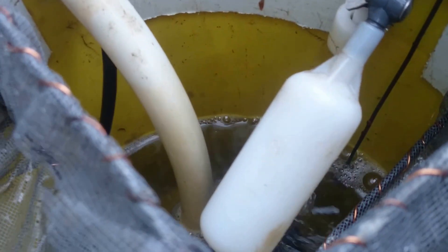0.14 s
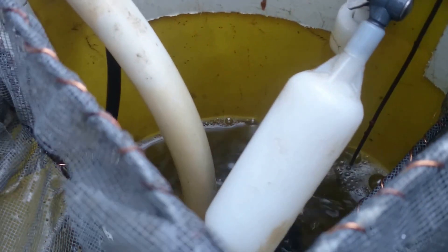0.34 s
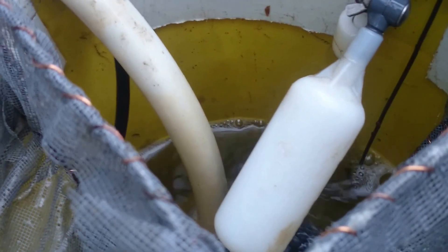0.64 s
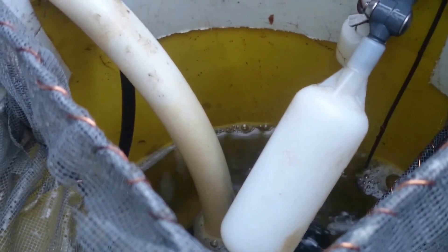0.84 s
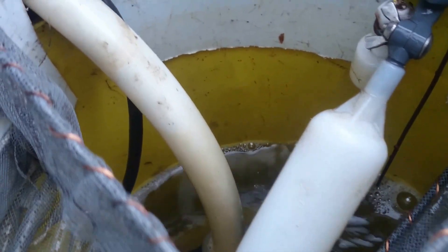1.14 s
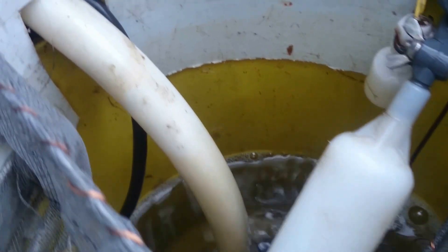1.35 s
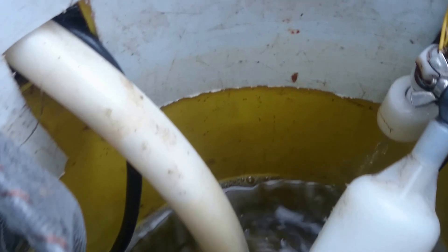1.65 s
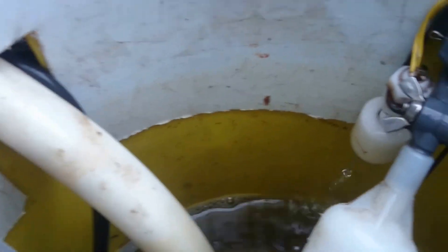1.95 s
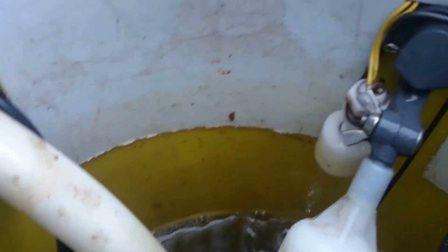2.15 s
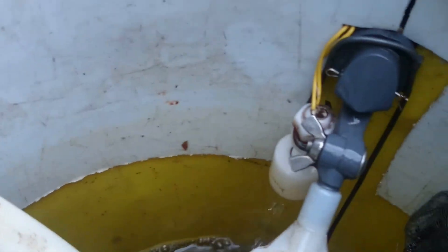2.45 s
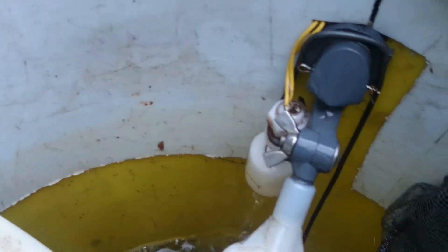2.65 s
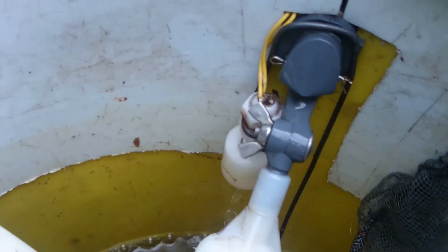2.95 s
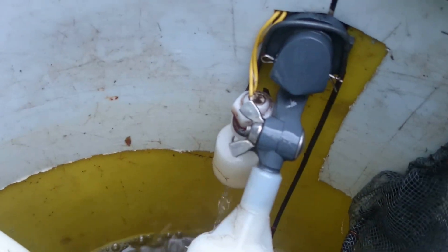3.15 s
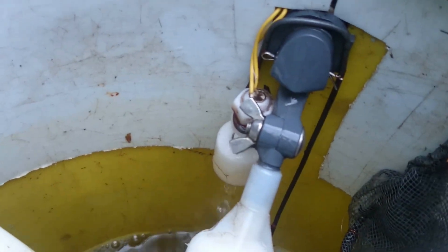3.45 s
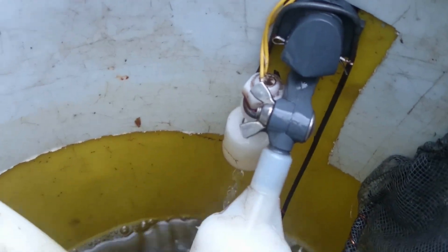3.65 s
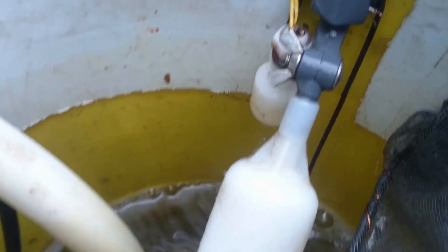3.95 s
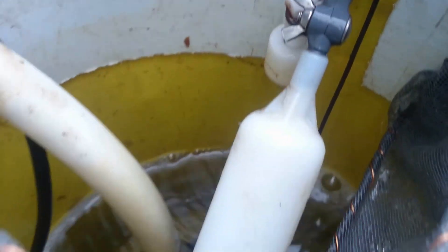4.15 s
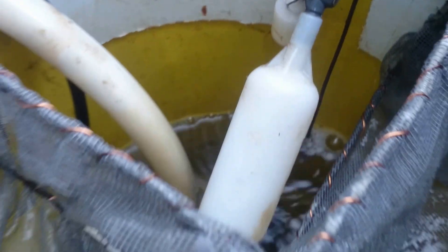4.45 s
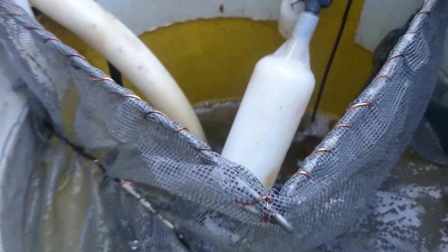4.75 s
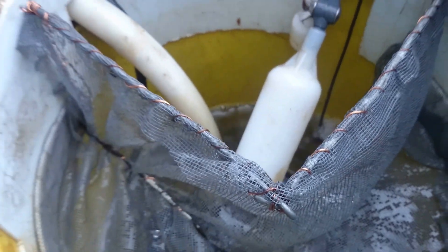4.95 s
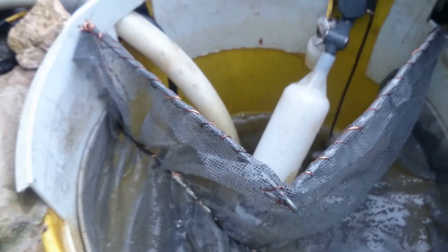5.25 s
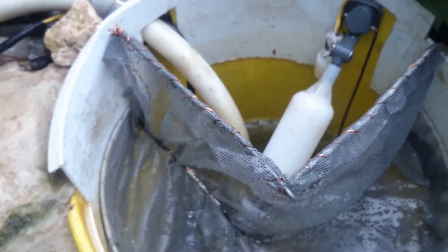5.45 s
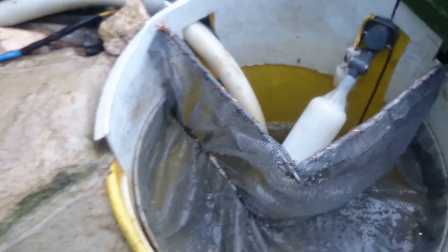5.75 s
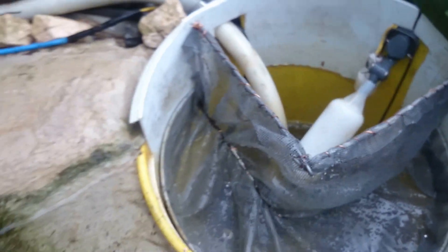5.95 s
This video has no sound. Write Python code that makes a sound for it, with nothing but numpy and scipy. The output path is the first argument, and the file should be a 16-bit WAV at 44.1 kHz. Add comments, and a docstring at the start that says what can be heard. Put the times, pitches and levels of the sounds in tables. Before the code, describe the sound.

An irregular trickle lands in a plastic tub, heard from just above the rim. Sharp ticks and small wet splats alternate with glassy plinks, tiny upward bubble chirps and fine droplet patter leaning left. It starts sparse, grows busy in the middle, peaks with hard splashes past four seconds, and becomes sparser again. Faint airy hiss and soft pump rumble continue throughout, with brief hollow plastic resonance.

```python
"""Water drips and plinks into a half-full plastic bucket from a float valve, heard just above the rim.
Each drop makes a thud, a wet slap and a hard tick, from filtered sharp pushes with echoes off the wall.
Bubbles are fading tones that rise in pitch, some stirred into a gurgle; tiny bubbles and ticks make a patter.
The bucket rings along with all of these. Some bubbles sweep upward as they open, and thin whistles come and go.
Underneath, shaped noise makes the valve's hiss and the pump's rumble, with faint steady pump tones."""
import sys
import numpy as np
from scipy import signal
from scipy.fft import rfft, irfft
from scipy.io import wavfile
from scipy.ndimage import uniform_filter1d

SR = 44100
rng = np.random.default_rng(int(sys.argv[2]) if len(sys.argv) > 2 else 0)


def inscribe(sig):
    """Save sig as 16-bit PCM at rate SR to the path in sys.argv[1].

    A 1-D sig is mono; a 2-D sig holds one channel per row.
    Samples are clipped to [-1, 1] before scaling.
    """
    pcm = np.round(np.clip(np.atleast_2d(sig).T, -1, 1) * 32767)
    wavfile.write(sys.argv[1], SR, pcm.astype(np.int16))


N = 269892

# The hiss of the valve. Each row: frequency in Hz, relative strength in dB per Hz.
HISS_SPECTRUM = [(240, -24.5), (400, -27), (730, -26), (777, -23), (1010, -22), (1650, -25), (1960, -15),
                 (2150, -19), (2840, -12), (3260, -17.5), (3990, -6.5), (5690, -7), (7630, -19),
                 (10200, -17.5), (16000, -23)]
# The narrow band in which the valve's gap sings. Each row: time in seconds, centre in Hz, dB over the hiss.
VALVE_SONG = [(0, 5500, -2), (.75, 5350, -14), (1.5, 5650, -8), (2.7, 5230, -20), (3.8, 5530, -10),
              (4.75, 5270, -13), (5.6, 5340, -5), (6.12, 5480, -11)]
# Pump and surroundings. Each row: frequency in Hz, relative strength in dB per Hz.
RUMBLE_SPECTRUM = [(20, -60), (36, -12), (50, -12), (62, 3), (82, -2), (105, -6), (128, -7.5), (160, -11.5),
                   (230, -13), (350, -25.5), (600, -27.5), (1200, -47)]
# Steady tones of the pump. Each row: frequency in Hz, level in dB.
PUMP_TONES = [(60, -75), (721.4, -86)]
# Strength of the trickle, fullest in the middle; each sound adds its own offset.
# Each row: time in seconds, strength in dB.
TRICKLE_FLOW = [(0.0, -55), (0.49, -54.5), (2.25, -52), (2.5, -49.5), (4.5, -51), (4.81, -52),
                (5.61, -50.5), (6.12, -57)]
# The water stirred up by the drops, before the gurgle's overall offset.
# Each row: time in seconds, gurgle strength in dB.
GURGLE_STRENGTH = [(0.0, -57), (0.22, -70), (1.28, -80), (1.43, -72.5), (2.1, -63.5), (2.86, -73),
                   (3.48, -61.5), (4.12, -72), (4.33, -55), (4.74, -75), (5.67, -62), (6.12, -67)]
# Air and wall resonances of the bucket. Each row: frequency in Hz, time to fade by 60 dB in seconds,
# relative strength in dB.
BUCKET_MODES = [(1247, 0.19, -1), (1573, 0.035, 6.5), (1816, 0.15, -3), (2202, 0.07, 7),
                (3513, 0.021, -0.5), (4040, 0.051, -2.5), (4812, 0.033, -7.5), (6250, 0.044, 4),
                (6700, 0.079, 0)]
# Drops landing. Each row: start in seconds, level of slap and tick together in dB over 10 ms
# (before the slap's small trim), tick over slap in dB, tick centre in Hz,
# thud from 0 (open water) to 1 (square on the hollow float).
DROP_LANDINGS = [(.014, -33, -12, 10900, 0.97), (.101, -34, -11.5, 10200, 0.64),
                 (.486, -36.5, 9, 9550, 0.23), (.7224, -43, -2.5, 12100, 0.34),
                 (.7493, -41.5, 26, 14000, 0.055), (.7943, -39.5, 4, 8600, 0), (.848, -31.5, 13, 13300, 0),
                 (1.1618, -43, 24, 12300, .1), (1.2054, -30.5, -5.5, 11400, 0),
                 (1.2817, -24, -4.5, 9300, 0), (1.303, -38.5, -4, 10800, 0), (1.4031, -33.5, -7, 10300, 0),
                 (1.479, -41, 2, 10100, 0.6), (1.485, -41, -8, 12400, .75), (1.5514, -39, -11, 8600, 0),
                 (1.7131, -36, 17, 11500, .1), (1.865, -35, -3, 10000, 0.76),
                 (1.8838, -27, -8.5, 10200, 0.44), (2.0038, -38, -17, 12500, 0.9),
                 (2.1054, -30.5, -2.5, 10500, 0), (2.1309, -36.5, -3, 9600, 0.82),
                 (2.1544, -38.5, -1, 10900, 0.57), (2.1872, -32, -8.5, 9500, 0.74),
                 (2.215, -43.5, 22, 14000, 0.95), (2.2282, -41, -10, 11000, .15),
                 (2.2396, -29, 12, 8640, 0.34), (2.3413, -33.5, -11, 13400, 0.78),
                 (2.4551, -32.5, 10, 8400, 0.58), (2.5116, -34, 31, 10100, 0.27),
                 (2.5503, -33, 0, 9850, 0.79), (2.6066, -40, -4, 11800, 0.39),
                 (2.7442, -32.5, -8, 10300, 0.81), (2.7528, -41, 16, 9800, .4),
                 (2.7769, -30, 4, 13200, 0.27), (2.865, -34, 7, 13500, 0.79), (2.9109, -33, 9, 10300, 0.45),
                 (2.9292, -37.5, 7, 9000, 0.69), (2.9707, -33, 0.5, 8800, .1), (2.9957, -37, 0, 9100, 0.23),
                 (3.1014, -39, -4.5, 11500, 1), (3.1258, -33.5, 27, 9800, 0.58),
                 (3.166, -41, 15, 9600, 0.48), (3.2147, -43, 12, 12500, 0.95), (3.249, -34, -7.5, 9100, 0),
                 (3.3106, -30.5, -12, 8600, 0), (3.3273, -36, 12, 10300, 0.65),
                 (3.35, -36.5, -12, 10800, 0.19), (3.3685, -37, 8, 10900, 0.58),
                 (3.4703, -37, -16, 8250, 0), (3.5111, -29.5, -12.5, 11500, 0),
                 (3.5448, -34.5, -2, 9100, 0.6), (3.5835, -30.5, -16, 10100, 0),
                 (3.734, -41.5, 8, 9250, .1), (3.7626, -32.5, -21, 12000, 0.094),
                 (3.77, -32.5, -12, 9600, 0), (3.791, -40, -7, 12200, 0.76),
                 (3.8103, -34.5, -7, 10800, 0.7), (3.885, -42.5, 8, 10000, .3),
                 (3.9388, -34, -1.5, 13000, 0.62), (4.0279, -29, 22, 9450, 0.11),
                 (4.0738, -26.5, 6.5, 9150, 0), (4.0868, -39, -1, 9300, 0.39),
                 (4.0937, -35.5, -13, 10000, 0.88), (4.1486, -24.5, 28, 13900, 0.12),
                 (4.1756, -26, -6, 10600, 0.38), (4.1995, -22, 13.5, 8800, 0.47),
                 (4.2195, -41, -12, 10800, 1), (4.2817, -37.5, -23, 11800, 0.00022),
                 (4.2941, -36, -4, 9400, .65), (4.336, -41.5, 2, 8900, 0), (4.3828, -34.5, -5, 8360, 0.97),
                 (4.4358, -33.5, 1, 9000, 0), (4.488, -38, 14, 9800, 0.75), (4.614, -36.5, 19, 10600, 0.71),
                 (4.6335, -33.5, 10, 8500, .2), (4.8059, -41, 14, 10800, .2), (4.8207, -35, 1, 9200, 0.66),
                 (4.8925, -43, -4, 12700, 0.86), (4.9975, -41.5, 6, 9850, 0.57),
                 (5.272, -33, 33, 8600, 0.21), (5.2911, -30.5, -6, 8400, 0.45), (5.4001, -33.5, 9, 8450, 0),
                 (5.423, -44, -5, 9000, 0.91), (5.465, -35.5, -11, 9200, .85),
                 (5.5196, -38.5, -9, 9750, 0.63), (5.5786, -38.5, -16, 11300, 0.96),
                 (5.5987, -39.5, -3, 9800, 0.79), (5.707, -37, 18, 10700, .35),
                 (5.8094, -35.5, -4, 12500, 0.87)]
# The plinks that stand out. Each row: start in seconds, first pitch in Hz,
# level in dB over 10 ms before a shared gain, left minus right in dB.
CLEAR_PLINKS = [(0.0167, 963, -43.5, 3), (0.1001, 2060, -43, 1), (0.0984, 4200, -46, -21),
                (.3879, 4330, -43.5, 8), (0.4867, 6620, -29, -5), (0.723, 1960, -43.5, 9),
                (0.7927, 4745, -28.5, -8), (1.148, 6500, -43.5, -9), (1.2833, 1880, -37.5, 0),
                (1.3025, 2390, -40.5, 5), (1.4027, 2630, -40, 3), (1.4342, 1480, -54, 4),
                (1.435, 4060, -43.5, -7), (1.4789, 796, -53.5, 6), (1.4857, 3570, -35.5, -9),
                (1.5182, 1550, -54.5, 6), (1.5513, 2090, -53, 10), (1.5742, 2050, -50, 2),
                (1.6438, 4040, -37.5, -6), (1.7879, 4210, -32.5, -11), (1.8168, 1650, -49.5, 7),
                (1.8647, 1201, -45, -7), (1.865, 4080, -34.5, -10), (1.8837, 2600, -34, 15),
                (2.0034, 870, -49, 5), (2.1046, 2836, -35, 1), (2.1304, 4010, -23.5, -6),
                (2.1876, 3517, -19.5, -8.5), (2.2277, 1590, -48.5, 1), (2.2396, 4010, -31.5, -9),
                (2.341, 2120, -50, 4), (2.4161, 4990, -29.5, -7), (2.487, 4100, -40, -9),
                (2.5115, 4720, -17.5, 0), (2.551, 4850, -25, -3), (2.5758, 1524, -43, 5),
                (2.7767, 3730, -25, 5), (2.83, 1065, -58.5, 6), (2.971, 4040, -24.5, -5),
                (2.997, 3520, -36, -11), (3.128, 7130, -34.5, -6), (3.191, 500, -67, -3),
                (3.2141, 3500, -22, -8), (3.2875, 4540, -32.5, 8), (3.3106, 3270, -35, -14),
                (3.3359, 4700, -23.5, 6), (3.3501, 1920, -42.5, 7), (3.4924, 1520, -49.5, 12),
                (3.5105, 3630, -22, -7.5), (3.5442, 3520, -34, -5), (3.583, 1790, -37, -2),
                (3.7628, 1673, -38.5, 3), (3.7719, 6010, -32, -8), (3.7799, 2225, -40, 4),
                (3.858, 1086, -57.5, -7), (3.8861, 4980, -28.5, -5), (3.9613, 1090, -58, 1),
                (4.0923, 3020, -36, 12), (4.1754, 1800, -46, -1), (4.274, 4600, -34, -4),
                (4.2814, 2175, -51, 14), (4.335, 4730, -35, -2), (4.3742, 5340, -40, -3),
                (4.3832, 1144, -59, 3), (4.4743, 5220, -40, -1), (4.8211, 4920, -34.5, -2),
                (5.2205, 1150, -55, -3), (5.3753, 1770, -53, -12), (5.5783, 1220, -53.5, 2),
                (5.707, 6320, -34.5, -8), (5.7544, 3180, -44, -12), (5.8097, 3710, -39.5, -17),
                (5.999, 1810, -51, -11)]
# Bubbles at the surface that open and sweep upward. Each row: start in seconds, length in seconds,
# first pitch in Hz, level in dB over 10 ms.
SURFACE_SWOOPS = [(.116, .012, 1820, -39), (.308, .016, 1720, -40.5), (2.533, .01, 3310, -25.5),
                  (2.613, .013, 1770, -38.5), (2.646, .02, 2910, -31), (2.751, .007, 3250, -28.5),
                  (2.968, .01, 3730, -26), (3.1906, .014, 2160, -35.5), (3.211, .012, 2920, -45),
                  (3.4397, .008, 2450, -42.5), (4.489, .008, 2840, -45), (4.8615, .008, 2350, -33.5),
                  (5.2685, .007, 2850, -37), (5.463, .0094, 2030, -31.5), (5.557, .01, 2680, -28.5)]
# Thin faint whistles. Each row: start in seconds, length in seconds, middle pitch in Hz, level in dB.
THIN_WHISTLES = [(.60, 0.19, 2480, -65), (0.766, 0.12, 2530, -63), (1.669, 0.19, 3430, -56.5),
                 (2.603, 0.18, 3390, -55.5)]

RING = int(.11 * SR)  # samples in one short sound
AGE, TIME = np.arange(RING) / SR, np.arange(N) / SR  # seconds into a short sound, and into the scene
TOP_HZ = 16200
HISS_DB, RUMBLE_DB = -51.5, -65.5  # the hiss level before its flutter and drift
# A bubble rings for a number of cycles, so large, low ones last longest.
# Its pitch climbs by a share per second that grows with the pitch: BUBBLE_RISE is the share at RISE_AT_HZ.
BUBBLE_CYCLES, BUBBLE_RISE, RISE_AT_HZ = 81.6, 6, 4000
THUD_WATER_DB, THUD_FLOAT_DB = -49.5, -6  # a thud against its drop's level
THUD_BAND, SLAP_BAND = (1150, 3470), (3056, 5460)  # low and high edges in Hz
TICK_OCTAVES = 0.83  # width of a tick's band
SWOOP_TOP_HZ = 5420  # every sweep ends here, as the cavity closes


def undb(db):
    """Turn dB into a plain gain."""
    return 10 ** (np.asarray(db) / 20)


def level(x, db):
    """Bring each channel to an rms level (its average strength)."""
    return x * undb(db) / np.sqrt(np.mean(x ** 2, axis=-1, keepdims=True))


def burst(x, db):
    """Give each channel of a short sound the energy of 10 ms at this level."""
    return x * undb(db) * np.sqrt(SR / 100 / np.sum(x ** 2, axis=-1, keepdims=True))


def unit(x):
    """Give each channel unit energy."""
    return x / np.sqrt(np.sum(x ** 2, axis=-1, keepdims=True))


def sides(pan_db):
    """Left and right gains of constant power; pan_db is left minus right."""
    gains = undb(np.array([[pan_db], [-pan_db]]) / 2)
    return gains / np.sqrt(np.mean(gains ** 2))


def fade(t60):
    """Exponential decay, down 60 dB after t60 seconds."""
    return np.exp(-np.log(1000) * AGE / t60)


def add(out, s, sound):
    """Mix a short sound in at a time in seconds."""
    i = int(np.clip(s * SR, 0, N - 1))
    out[:, i:i + sound.shape[1]] += sound[:, :N - i]


def coloured(points, channels):
    """Unrelated noises whose spectrum follows (Hz, dB) points."""
    hz, db = np.transpose(points)
    log_hz = np.log(np.arange(N // 2 + 1) * SR / N + 1)
    gain = undb(np.interp(log_hz, np.log(hz), db))
    return irfft(rfft(rng.standard_normal((channels, N))) * gain, N)


def walk(rate):
    """A wandering curve: random values, rate of them per second, smoothed twice."""
    k = int(SR / rate)
    steps = np.repeat(rng.standard_normal(N // k + 1), k)
    return uniform_filter1d(uniform_filter1d(steps, k), k)[:N]


def follow(table):
    """The columns of a (seconds, ..) table at every sample."""
    s, *columns = np.transpose(table)
    return [np.interp(TIME, s, column) for column in columns]


def random_pitch(centre_hz, octaves, chance):
    """A pitch scattered about a centre, capped at a fifth of the sample rate."""
    return min(centre_hz * 2 ** (octaves * chance), SR / 5)


def scattered(count):
    """Random times, one in each equal stretch, with the trickle's strength at each."""
    times = (np.arange(count) + rng.random(count)) / count * N / SR
    return zip(times, np.interp(times, *np.transpose(TRICKLE_FLOW)))


def echoes(wall_db, wall_t60, tail_db, tail_t60):
    """Paths from one spot to both microphones: the direct one, quick bounces off the wall, a faint tail."""
    wall, tail = rng.standard_normal((2, 2, RING))
    detour = np.clip(AGE / 0.0014, 0, 1) ** 2  # echoes build up over 1.4 ms
    bounces = unit(wall ** 3 * detour * fade(wall_t60))  # cubing makes a few bounces stand out
    paths = undb(wall_db) * bounces + undb(tail_db) * unit(tail * detour * fade(tail_t60))
    # the direct sound reaches the right microphone one sample later
    paths[[0, 1], [0, 1]] += 1
    return paths


def reflected(tone, db, pan_db):
    """A short tone on the water as it reaches the microphones, echoes included."""
    paths = echoes(wall_db=-6, wall_t60=.025, tail_db=-13, tail_t60=.07)
    return burst(signal.fftconvolve(tone[None], paths, axes=1)[:, :RING], db) * sides(pan_db)


def bubble(hz, db, t60, rise, pan_db):
    """A bubble pinches off and rings; its pitch glides as it drifts towards the surface."""
    pitch = hz * (1 + np.tanh(rise * AGE))  # can at most double
    pinch = 1 - np.exp(-AGE / .00025)
    return reflected(np.sin(2 * np.pi * np.cumsum(pitch) / SR) * fade(t60) * pinch, db, pan_db)


def plink(hz, db, pan_db, ring_chance, rise_chance, ring_spread=.1, rise_spread=.4):
    """A bubble that rings and climbs by the common rule, a little differently each time."""
    t60 = BUBBLE_CYCLES / hz * np.exp(ring_spread * ring_chance)
    rise = BUBBLE_RISE * hz / RISE_AT_HZ * (1 + rise_spread * rise_chance)
    return bubble(hz, db, t60, rise, pan_db)


def bucket(x, ring_db):
    """The bucket's resonances ring on, with their own phase at each microphone."""
    phases = rng.uniform(0, 2 * np.pi, (len(BUCKET_MODES), 2, 1))
    ring = np.zeros((2, RING))
    for (hz, t60, db), phase in zip(BUCKET_MODES, phases):
        ring += undb(db) * unit(fade(t60) * np.sin(2 * np.pi * hz * AGE + phase))
    return x + undb(ring_db) * signal.fftconvolve(x, unit(ring), axes=1)[:, :N]


def valve(flutter_db=2, width_hz=130, drift_db=-1.57):
    """Water squeezing through the valve hisses, and its gap sings in a narrow, wandering band."""
    hz, sing_db = follow(VALVE_SONG)
    lowpass = signal.butter(2, width_hz, fs=SR, output="sos")
    eddies = signal.sosfilt(lowpass, rng.standard_normal((2, 2, N)))
    # slow noise is shifted up to sit around the singing pitch
    carrier = np.exp(2j * np.pi * np.cumsum(hz) / SR)
    sing = np.real((eddies[0] + 1j * eddies[1]) * carrier)
    hiss = level(coloured(HISS_SPECTRUM, channels=2), 0) + undb(sing_db) * level(sing, 0)
    return hiss * undb(HISS_DB + flutter_db * walk(160) + drift_db * walk(2.93)) * sides(-1.3)


def pump(apart_db=-7):
    """Low rumble, nearly alike on both sides, and faint steady tones."""
    noise = coloured(RUMBLE_SPECTRUM, channels=3)
    # one shared noise, plus a weaker one for each side
    rumble = level(noise[0] + undb(apart_db) * noise[1:], RUMBLE_DB)
    hum = sum(level(np.sin(2 * np.pi * hz * TIME), db) for hz, db in PUMP_TONES)
    return (rumble + hum) * sides(-2.0)


def patter(centre_hz, octaves, size_db, cycles, rise, pan_db, count):
    """Running or stirred water keeps making small bubbles at random times and pitches."""
    out = np.zeros((2, N))
    chances = zip(rng.random((count, 2)), rng.standard_normal((count, 3)))
    for (when, climb), (pitch, size, place) in chances:
        hz = random_pitch(centre_hz, octaves, pitch)
        db = size_db * min(size, 2) - 4 * abs(pitch)  # pitches far from the centre are softer
        add(out, when * N / SR, bubble(hz, db, cycles / hz, rise * climb, pan_db + 4 * place))
    return level(out, 0)


def spray(low_hz=5000, size_db=4, count=420):
    """The finest droplets only tick on the wall and the net."""
    out = np.zeros((2, N))
    for when, (size, place) in zip(rng.random(count), rng.standard_normal((count, 2))):
        paths = echoes(wall_db=19, wall_t60=0.0065, tail_db=-11, tail_t60=.06)
        add(out, when * N / SR, paths * undb(size_db * min(size, 2)) * sides(4 * place))
    return level(signal.sosfilt(signal.butter(2, low_hz, "highpass", fs=SR, output="sos"), out), 0)


def slap_and_tick(db, bright_db):
    """A drop's energy is shared between a wet slap and a hard tick."""
    slap_db = db - 10 * np.log10(1 + undb(bright_db) ** 2)
    return slap_db, slap_db + bright_db


def splats(drops, slap_trim_db=0.16, pan_db=-4, pan_spread_db=2):
    """Each impact is one sharp push, dull or bright by what it hits; the wall scatters its lows most."""
    out = np.zeros((2, N))
    for (s, db, bright_db, tick_hz, thud), place in zip(drops, rng.standard_normal(len(drops))):
        slap_db, tick_db = slap_and_tick(db, bright_db)
        thud_db = db + THUD_WATER_DB + thud * (THUD_FLOAT_DB - THUD_WATER_DB)
        tick_band = tick_hz * 2 ** (TICK_OCTAVES * np.array([-.5, .5]))
        low = echoes(wall_db=0, wall_t60=.025, tail_db=-8, tail_t60=.07)
        high = echoes(wall_db=-2, wall_t60=.018, tail_db=-11, tail_t60=.05)
        # the last number shifts each part left (+) or right (-) in dB
        parts = [
            (THUD_BAND, low, thud_db, 4),
            (SLAP_BAND, low, slap_db + slap_trim_db, 0),
            (tick_band, high, tick_db, -1.5),
        ]
        for edges, paths, part_db, shade_db in parts:
            band = signal.butter(2, np.minimum(edges, .48 * SR), "bandpass", fs=SR)
            part = burst(signal.lfilter(*band, paths), part_db)
            add(out, s, part * sides(pan_db + pan_spread_db * place + shade_db))
    return out


def stray_drops(over_flow_db=6, spread_db=8.5, bright_db=-7, bright_spread_db=8,
                tick_hz=10000, most_thud=0.48, count=38):
    """Softer drops between the loud ones, as rows like those of DROP_LANDINGS."""
    drops = []
    for (s, flow_db), (size, bright, thud) in zip(scattered(count), rng.standard_normal((count, 3))):
        db = flow_db + over_flow_db + spread_db * min(size, 1)
        tick_over_slap_db = bright_db + bright_spread_db * bright
        drops.append((s, db, tick_over_slap_db, tick_hz, most_thud * min(abs(thud) / 2, 1)))
    return drops


def fallback(drops, flight_s=0.006, under_db=-14, centre_hz=4300, octaves=0.31,
             cycles=26, rise=30, pan_db=-6.5, count=3):
    """Every slap throws up a few droplets that land just after it as a blur of tiny bubbles."""
    out = np.zeros((2, N))
    for s, db, bright_db, *_ in drops:
        slap_db, _ = slap_and_tick(db, bright_db)
        for pitch, size, flight, climb in rng.standard_normal((count, 4)):
            hz = random_pitch(centre_hz, octaves, pitch)
            landing = s + 0.0033 + flight_s * abs(flight)
            bubble_db = slap_db + under_db + 3.6 * size
            add(out, landing, bubble(hz, bubble_db, cycles / hz, rise * abs(climb), pan_db))
    return out


def bubbles(gain_db=1):
    """The plinks that stand out, each a ringing bubble."""
    out = np.zeros((2, N))
    chances = rng.standard_normal((len(CLEAR_PLINKS), 2))
    for (s, hz, db, pan_db), chance in zip(CLEAR_PLINKS, chances):
        add(out, s, plink(hz, db + gain_db, pan_db, *chance))
    return out


def stray_bubbles(centre_hz, octaves, over_flow_db, pan_db, count, spread_db=3):
    """Softer plinks at random moments, louder when the trickle runs fuller."""
    out = np.zeros((2, N))
    chances = rng.standard_normal((count, 5))
    for (s, flow_db), (pitch, size, place, *chance) in zip(scattered(count), chances):
        hz = random_pitch(centre_hz, octaves, pitch)
        db = flow_db + over_flow_db + spread_db * min(size, 1)
        add(out, s, plink(hz, db, pan_db + 5 * place, *chance))
    return out


def swoops(pan_db=-6.5):
    """A bubble breaking the surface swells in sound as its cavity shrinks and its pitch shoots up."""
    out = np.zeros((2, N))
    for s, length, first_hz, db in SURFACE_SWOOPS:
        part = np.clip(AGE / length, 0, 1)
        swell = np.sin(np.pi * np.interp(part, [0, .7, 1], [0, .5, 1]))  # loudest at 70 % of the length
        pitch = first_hz + (SWOOP_TOP_HZ - first_hz) * part
        tone = swell * np.sin(2 * np.pi * np.cumsum(pitch) / SR)
        add(out, s, reflected(tone, db, pan_db))
    return out


def whistles(waver=0.0125, flutter_db=5):
    """Thin tones with a wavering pitch that swell, flutter and fade."""
    out = np.zeros((2, N))
    for s, length, hz, db in THIN_WHISTLES:
        n = int(length * SR)
        pitch = hz * (1 + waver * walk(123)[:n])
        tone = np.sin(2 * np.pi * np.cumsum(pitch) / SR) * undb(flutter_db * walk(77)[:n])
        add(out, s, level(tone * signal.windows.tukey(n, .4), db) * sides(-3.6))
    return out


def scene():
    """Drops, bubbles, patter and gurgle ring the bucket, over the whistles, the valve and the pump."""
    (flow_db,), (gurgle_db,) = follow(TRICKLE_FLOW), follow(GURGLE_STRENGTH)
    tiny = patter(centre_hz=4870, octaves=0.36, size_db=5.0, cycles=44, rise=35, pan_db=-13.0, count=520)
    fine = (undb(-1.5) * tiny + undb(-8.5) * spray()) * undb(flow_db) * sides(-8.5)
    stirred = patter(centre_hz=1523, octaves=0.364, size_db=6.0, cycles=100, rise=7.1, pan_db=-6, count=380)
    gurgle = stirred * undb(gurgle_db - 5.5)
    drops = DROP_LANDINGS + stray_drops()
    impacts = splats(drops) + fallback(drops)
    large = stray_bubbles(centre_hz=1900, octaves=0.2, over_flow_db=-6.5, pan_db=2, count=30)
    small = stray_bubbles(centre_hz=4350, octaves=0.204, over_flow_db=0, pan_db=-7, count=16)
    plinks = bubbles() + large + small + swoops()
    water = bucket(fine + gurgle + impacts + plinks, ring_db=-14.5)
    return water + whistles() + valve() + pump()


def record(dry):
    """The recorder steeply cuts everything above TOP_HZ."""
    return signal.sosfilt(signal.ellip(8, .2, 70, TOP_HZ, fs=SR, output="sos"), dry)


dry = scene()
out = record(dry)
inscribe(out)
```